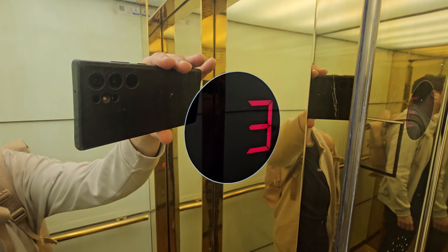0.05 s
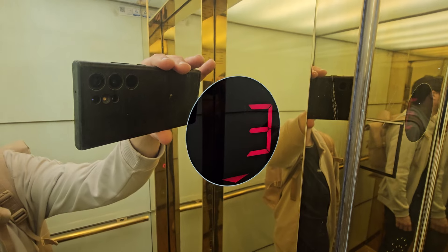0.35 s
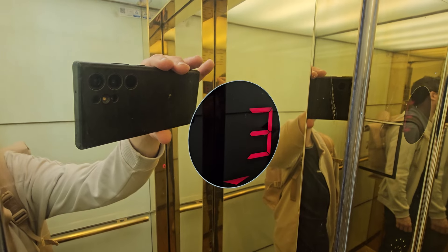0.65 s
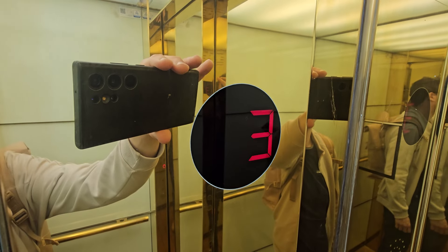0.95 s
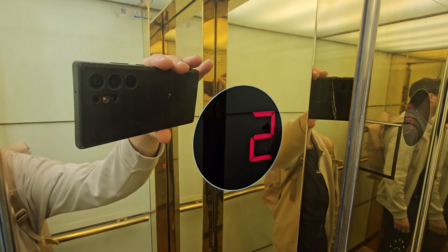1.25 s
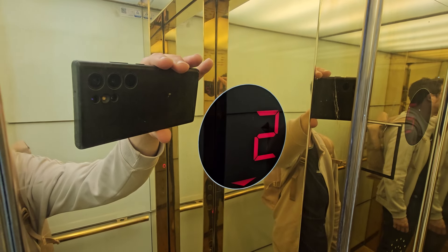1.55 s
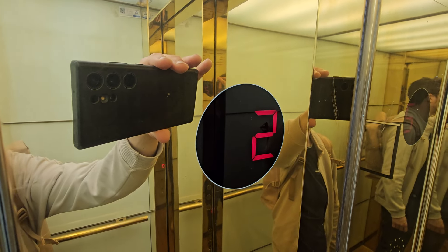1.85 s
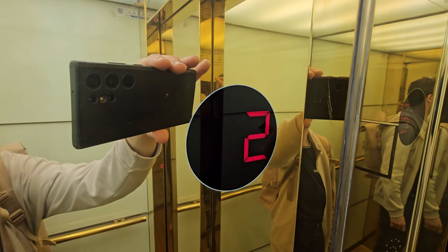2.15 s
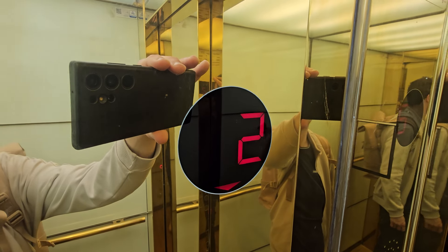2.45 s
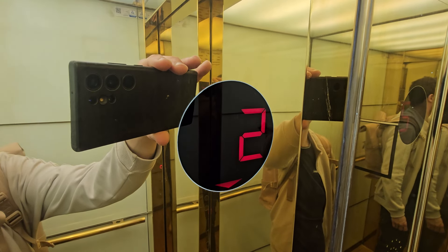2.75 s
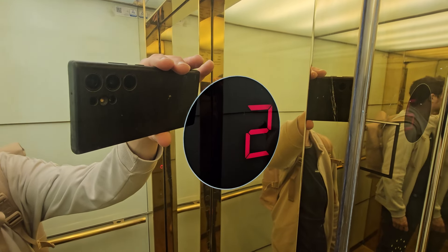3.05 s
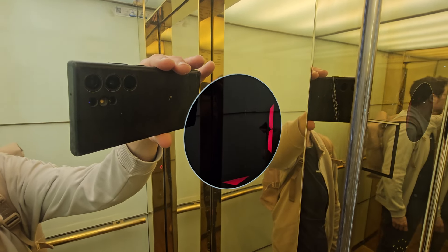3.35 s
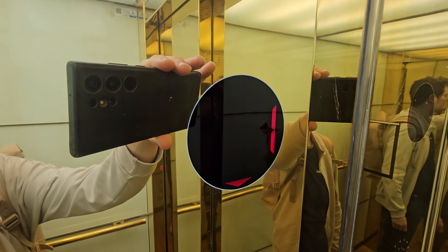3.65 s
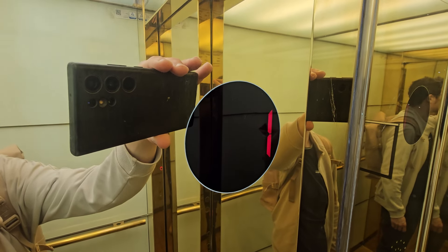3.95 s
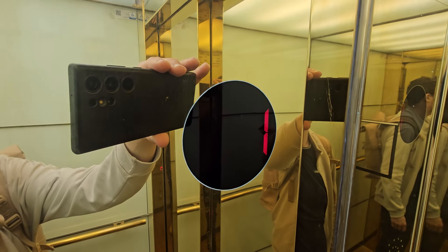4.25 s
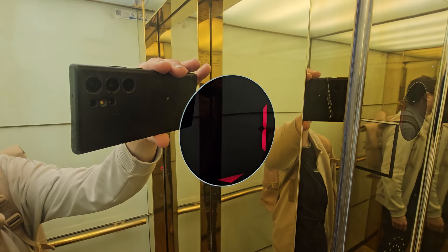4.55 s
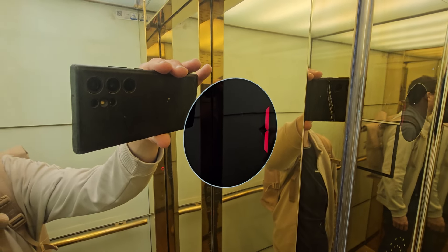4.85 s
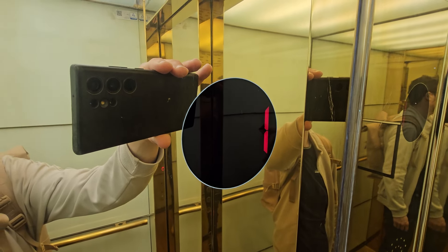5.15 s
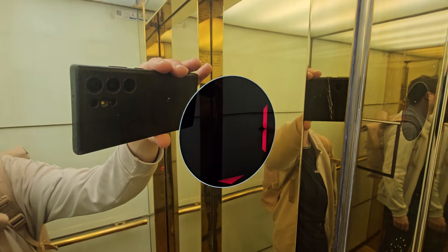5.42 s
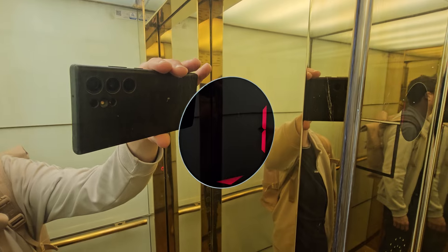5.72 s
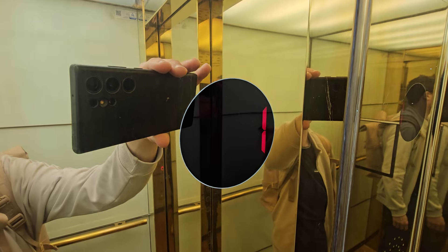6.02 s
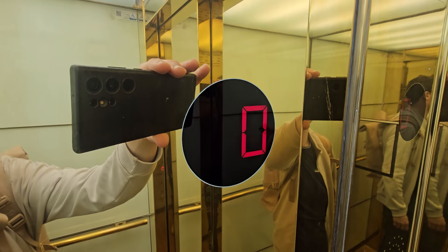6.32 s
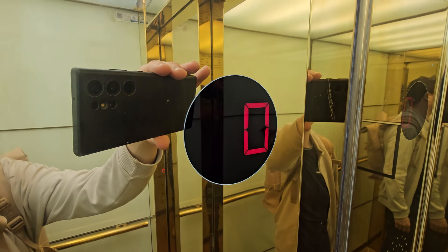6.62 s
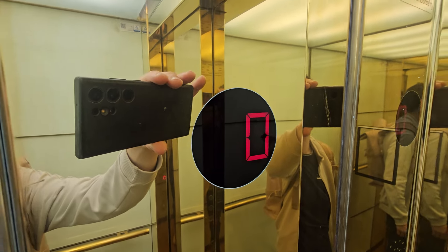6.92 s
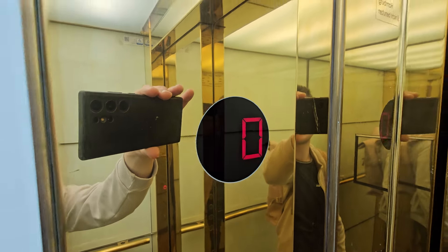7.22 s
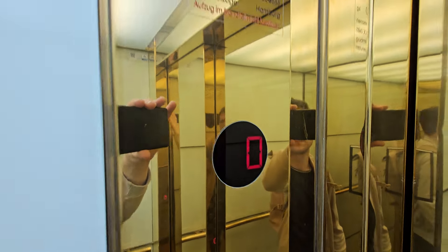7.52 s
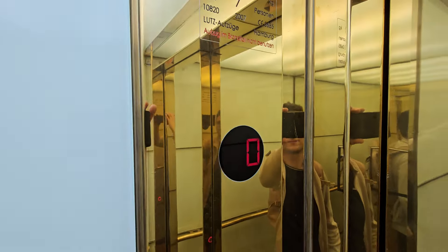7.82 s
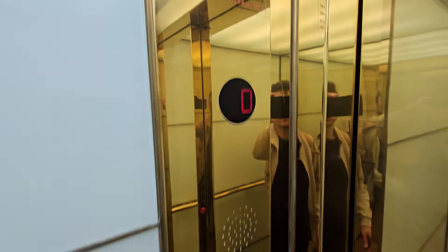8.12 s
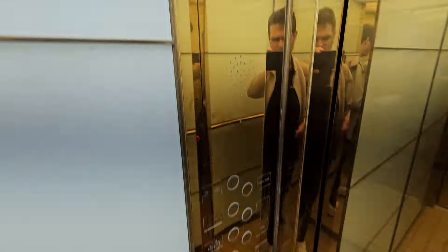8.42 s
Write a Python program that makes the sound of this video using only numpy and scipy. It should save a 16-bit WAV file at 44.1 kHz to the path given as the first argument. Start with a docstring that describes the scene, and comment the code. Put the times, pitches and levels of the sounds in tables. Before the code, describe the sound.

A passenger elevator travels down with a low, wavering rumble, heard from inside the cab. A fan and a faint electrical hum run underneath, along with a pulsing chirr from the drive. Short swishes pass, with a metal clack and then a lighter click. Air hiss grows toward the landing. The car slows with soft bumps and thin scrapes, and the door motor hums faintly as the ride eases.

```python
"""Inside the cab of a passenger lift that runs down its shaft and slows for the landing.
The ride shakes the cab, which booms at its lowest air mode and rings at higher ones; the drive chirrs
near 2 kHz. Air hiss and the gear's singing grow towards the landing over a bed of fan, mains hum and
thin electronic whine. Swishes, two metal knocks, rubs of the guides and soft bumps pass by, and the
door motor hums as the car stops."""
import sys
import numpy as np
from scipy import signal
from scipy.fft import rfft, irfft, next_fast_len
from scipy.io import wavfile
from scipy.ndimage import uniform_filter1d

SR = 44100
rng = np.random.default_rng(int(sys.argv[2]) if len(sys.argv) > 2 else 0)


def wav_out(sig):
    """Save sig, one row per channel (or a flat mono array), as 16-bit PCM at SR to the path in sys.argv[1]."""
    wavfile.write(sys.argv[1], SR, np.round(np.clip(np.atleast_2d(sig).T, -1, 1) * 32767).astype(np.int16))


N = 378378
TIME = np.arange(N) / SR
FREQ = np.maximum(np.fft.rfftfreq(next_fast_len(N, True), 1 / SR), 1)

# The cab's stereo image. Each row: frequency in Hz, balance in dB.
LEFT_OVER_RIGHT = [(110, 8.5), (200, -3.5), (380, -1), (700, -1), (1300, -4), (2400, -1.5), (4400, -4),
                   (8000, -2), (13000, -4.5)]
SIDE_OVER_MID = [(40, -13.5), (90, -22.5), (170, -26.5), (290, -8.5), (600, -2), (1300, 0.5), (3000, 0),
                 (8000, -0.5), (15000, 2.5)]

# Fader moves for the running layers. Each row: time in seconds, relative level in dB.
FAN_FADER = [(0, -41.5), (2.0, -36.5), (2.5, -35.5), (3.8, -43), (6.2, -41.5), (7.3, -46.5), (7.75, -36.5),
             (8.05, -34.5), (8.58, -37.5)]
OCTAVE_FADER = [(0, -48.5), (0.45, -43), (0.8, -45), (1.05, -55), (2.5, -50.5), (4.2, -46), (4.65, -50.5),
                (5.2, -46), (5.8, -54), (6.45, -47), (7.2, -60), (8.58, -72)]
DOOR_FADER = [(6.7, -92), (7.15, -67.5), (7.5, -67), (7.8, -63), (8.15, -72), (8.58, -66)]
AIR_FADER = [(0, -79.5), (2.0, -76.5), (3.3, -75), (5.2, -72), (5.85, -68), (6.6, -67.5), (7.7, -67),
             (8.58, -67)]
GEAR_FADER = [(0, -67.5), (2.2, -66), (4.2, -64.5), (5.0, -65), (6.1, -61.5), (6.7, -62), (7.3, -68),
              (8.58, -75)]
SWAY_FADER = [(0, -34.5), (1.4, -35.5), (3.7, -34.5), (4.5, -37), (6.0, -35.5), (6.95, -35), (7.6, -34.5),
              (8.58, -36)]
CAB_FADER = [(0, -41.5), (2.2, -40), (4.0, -40), (5.0, -40), (6.6, -38.5), (7.1, -41.5), (7.7, -46),
             (8.1, -47), (8.58, -51)]
BOOM_FADER = [(0.0, -27.5), (0.1, -20), (0.26, -30), (0.75, -27), (1.05, -32.5), (1.17, -21.5),
              (1.53, -26.5), (1.96, -22.5), (2.3, -27), (2.67, -32.5), (2.87, -20), (3.17, -22),
              (3.4, -27.5), (3.55, -27.5), (3.7, -27), (3.86, -13.5), (3.99, -20.5), (4.38, -31.5),
              (4.55, -25.5), (4.65, -19), (4.86, -34.5), (4.95, -20), (5.02, -31), (5.11, -20),
              (5.36, -27.5), (5.62, -19), (5.72, -21.5), (5.88, -17), (6.1, -34.5), (6.22, -22.5),
              (6.43, -30.5), (6.62, -20), (6.76, -33), (7.04, -36), (7.22, -26.5), (7.34, -36.5),
              (7.66, -38), (7.75, -22.5), (7.92, -43), (8.02, -26), (8.22, -45), (8.58, -41.5)]

# Broad tone of each noise layer. Each row: frequency in Hz, relative level in dB.
SHAFT_EQ = [(400, -13), (800, -14), (1200, -3.5), (1700, -8), (2150, 1.5), (2600, -12), (3150, -2.5),
            (3600, -1), (4100, -3), (4450, -5.5), (5200, -9), (7500, -11), (9000, -17.5), (10500, -33),
            (13000, -22.5), (15000, -36.5)]
LANDING_EQ = [(400, -1), (650, -5.5), (850, 1.5), (1200, -1.5), (1550, -4.5), (2100, -1), (2700, -8),
              (4200, -8), (4800, -14), (8500, -20.5), (10200, -31), (14000, -26.5), (15500, -37.5)]
SWISH_BODY_EQ = [(600, -3), (1150, -4.5), (1600, -8), (2200, -10.5)]
SWISH_RASP_EQ = [(1700, -2), (2500, -1), (3400, -2.5), (4700, -3.5), (6500, -17.5)]
SWISH_SIZZLE_EQ = [(5000, -14.5), (7800, -4.5), (10200, -9.5), (11800, -1), (14000, -4.5), (15500, -5.5)]
SWAY_EQ = [(10, -36.5), (18, -12), (28, -3), (38, -1), (52, -10), (68, -1.5), (80, -18.5), (120, -45)]
CAB_EQ = [(95, -22), (115, -11), (150, -0.5), (195, -17), (250, -16.5), (380, -14.5), (480, -15),
          (600, -23), (750, -30), (1200, -32), (1700, -35), (3000, -43.5)]

# Resonances of the landing, the gear, the drive and the cab's air and panels.
# Each row: frequency in Hz, width in Hz, relative level in dB.
LANDING_PEAKS = [(329, 28, 16), (414, 47, 14.5), (501, 12, 13), (566, 11, 12.5), (596, 18, 11.5),
                 (673, 24, 4.5), (1157, 6.7, 5.5), (1360, 46, 0), (1690, 30, 0), (1920, 100, 1.5),
                 (2200, 78, -4), (3680, 170, -11.5), (4200, 150, -8), (5650, 610, -10), (7300, 340, -13.5),
                 (8500, 190, -15.5)]
GEAR_PEAKS = [(1357, 17, -0.5), (1432, 59, -1), (1491, 20, 2.5), (2406, 50, -6), (2830, 96, -10.5),
              (3166, 105, -4.5), (3500, 81, -10), (4027, 125, -4.5), (4695, 130, -12.5), (6150, 130, -16),
              (7150, 210, -20)]
DRIVE_PEAKS = [(1870, 49, -6), (1975, 25, 0.5), (2056, 34, 0)]
CAB_PEAKS = [(98, 12.5, 7.5), (128.9, 15, 3.5), (159.7, 13.2, 6.5), (178.8, 5.5, 1), (206.2, 15.8, 1.5),
             (230.9, 6, 2), (276, 12, -7), (314.5, 35, -9.5), (347.2, 5.3, -2), (420, 21, -14),
             (445.8, 15.8, -3.5), (481, 4.9, -12.5), (511.3, 9.5, -11.5), (569, 10, -13.5), (587, 42, -19),
             (687, 22, -20.5), (801, 23, -23.5), (1020, 13, -28.5), (1110, 2, -31)]

# Hum of the mains and of the door motor. Each row: frequency in Hz, relative level in dB.
MAINS_PARTIALS = [(100, -45.5), (200, -68), (400, -70), (500, -65), (600, -73), (800, -80.5)]
DOOR_PARTIALS = [(598, 2), (685, -8), (1168, -12.5)]
# The whine as the listener shifts through its standing waves.
# Each row: time in seconds, left level in dB, right level in dB.
WHINE_FADERS = [(0, -57, -55), (0.45, -80.5, -60), (1.05, -85, -63.5), (1.25, -63, -55), (1.9, -64.5, -58),
                (2.1, -82, -57), (2.3, -61.5, -54.5), (2.8, -77, -61), (2.95, -69, -57.5),
                (3.55, -63, -62.5), (3.8, -77, -56.5), (4.4, -85, -68), (4.85, -75, -54), (5.6, -80, -61),
                (6.35, -80.5, -60.5), (6.6, -66, -62), (6.9, -77, -68), (7.3, -69, -63), (8.3, -61, -55),
                (8.58, -66, -62)]
# Thin sliding scrapes. Each row: peak time in seconds, length in seconds, pitch at the peak in Hz,
# glide in Hz per second, width in Hz, level in dB.
SCRAPES = [(6.95, 0.91, 3670, 10, 40, -69), (7.6, 1.3, 4245, 100, 60.4, -71.5),
           (7.85, .7, 2170, 60, 45, -67.5)]
# Squeaks and rubs of the guides.
# Each row: peak time in seconds, length in seconds, pitch in Hz, width in Hz, level in dB.
GUIDE_RUBS = [(0.973, 0.23, 1110, 480, -58), (1.245, 0.35, 783, 200, -61), (1.994, 0.053, 1150, 450, -57),
              (2.313, 0.096, 960, 25, -61), (4.478, 0.07, 940, 75, -56.5), (5.287, 0.036, 1490, 97.2, -62),
              (5.561, 0.35, 440, 32, -48.5), (6.219, 0.1, 465, 33.33, -44.5),
              (6.829, 0.063, 1140, 170, -57), (6.835, 0.057, 346, 55.6, -43), (7.182, 0.04, 574, 80, -52),
              (7.72, .07, 2400, 600, -61), (7.747, 0.09, 1190, 283.3, -55), (7.923, 0.041, 670, 86.4, -56)]
# Single resonances of the car.
# Each row: peak time in seconds, length in seconds, pitch in Hz, level in dB.
CAR_SWELLS = [(5.044, 0.18, 212, -43), (5.09, 0.094, 446.4, -43), (6.43, 0.09, 177.5, -42),
              (7.003, 0.28, 37.43, -30.5), (7.925, 0.056, 129.3, -40), (7.98, 0.19, 33, -32),
              (8.344, 0.45, 32.3, -38.5)]
# Soft jolts of the car. Each row: start in seconds, level in dB, centre pitch in Hz.
CAR_BUMPS = [(1.15, -38, 215), (6.617, -42, 145), (6.9, -40.5, 199), (7.472, -34, 128), (7.909, -37.5, 205),
             (8.225, -45, 167)]
# The ring of two passing metal parts, a sharp clack and a lighter click.
# Each row: frequency in Hz, relative level in dB, seconds to fall 60 dB.
CLACK_RING = [(1070, -3.5, .26), (1107, 1, 0.27), (1700, -9.5, 0.26), (2135, -2, 0.25), (2900, -7.5, .14),
              (3280, -6, 0.081), (3960, -10.5, .26), (4820, -18, .14)]
CLICK_RING = [(1245, -6, .25), (1440, -6.5, 0.2), (1760, -13, .22), (3400, -1, .2), (4470, 1, .2),
              (5900, -6, .16), (8060, -6, .17)]
# Sliding contacts. Each row: start, rise, hold and body lag in seconds; body, rasp and sizzle levels
# in dB; sizzle tilt in dB per octave; left over right in dB.
SWISH_CUES = [(0.0, 0.0023, 0.043, 0.044, -52.5, -52, -44, -1, -3),
              (1.22, 0.012, 0.042, 0.013, -61, -62, -80, 9, -4),
              (2.413, 0.007, 0.012, .012, -51, -50.5, -59, -11.5, -3),
              (2.892, 0.016, 0.042, .012, -66, -63.5, -86, 5, -3),
              (3.649, 0.017, 0.02, 0.015, -53.5, -57, -52, -10, -4),
              (6.201, 0.012, 0.014, 0.01, -77, -64, -65, 1, -11),
              (7.991, 0.053, 0.03, .012, -86, -86, -62, -9, -5)]
# The drive's chirr. Each row: time in seconds, relative level in dB, pulse depth from 0 to 1.
DRIVE_PULSE = [(0, -66, 0.6), (0.7, -63, 0.6), (1.15, -67, .3), (1.75, -65.5, .42), (2.6, -66.5, 0.14),
               (3.55, -66, 0.3), (4.2, -65, 0.3), (4.8, -62.5, 0.6), (5.3, -64.5, 0.47), (5.6, -68.5, 0.4),
               (5.85, -63.5, 0.45), (6.4, -64, 0.14), (7.0, -71.5, 0.2), (8.58, -86, .2)]
# The drive's speed. Each row: time in seconds, turns per second.
DRIVE_SPEED = [(0, 22.3), (0.9, 22.8), (1.4, 18), (1.7, 22), (4.7, 19.8), (5.1, 20.8), (5.45, 23.5),
               (5.85, 21.6), (8.58, 18)]


def from_db(db):
    """Decibels to gain."""
    return 10 ** (np.asarray(db) / 20)


def rms_one(x):
    """Scale to unit power."""
    return x / np.sqrt(np.mean(x ** 2) + 1e-20)


def in_time(rows):
    """Each column of a timed curve at every sample."""
    s, *columns = np.transpose(rows)
    return [np.interp(TIME, s, c) for c in columns]


def at_hz(points, hz):
    """Read a table on a log-frequency axis."""
    f, value = np.transpose(points)
    return np.interp(np.log(hz), np.log(f), value)


def ramp(start_s, length_s):
    """An even rise from 0 to 1."""
    return np.clip((TIME - start_s) / length_s, 0, 1)


def bell(t, length):
    """A smooth swell and fade that peaks at t = 0."""
    return np.exp(-2 * (t / length) ** 2)


def hit(t, rise, hold, t60):
    """A straight attack, a hold, then a tail that falls 60 dB in t60 seconds."""
    return np.minimum(t / rise, 1) * np.exp(-np.log(1000) * np.maximum(t - rise - hold, 0) / t60)


def pan(db):
    """Channel gains that put the left db above the right."""
    return from_db(np.array([[db], [-db]]) / 2)


def band(centre, width):
    """The gain curve of one resonance."""
    return lambda hz: 1 / (1 + (2 * (hz - centre) / width) ** 2)


def colour(points, modes=(), at=FREQ):
    """Gain per frequency: a broad slope, rolled off at both ends, with resonances standing on it."""
    ends = np.minimum(1, at / points[0][0]) * np.minimum(1, points[-1][0] / at)
    power = (from_db(at_hz(points, at)) * ends ** 2) ** 2
    for hz, width, db in modes:
        power = power + from_db(db) ** 2 / (1 + ((at - hz) / width) ** 2 * 2) ** 2
    return np.sqrt(power)


def noise(gain):
    """Coloured stereo noise of unit power, narrow in the bass and wide in the treble."""
    mid, side = rng.standard_normal((2, len(FREQ))) + 1j * rng.standard_normal((2, len(FREQ)))
    sides = np.array([[1], [-1]])
    pair = mid + from_db(at_hz(SIDE_OVER_MID, FREQ)) * side * sides
    # long waves reach both sides equally
    lean_db = at_hz(LEFT_OVER_RIGHT, FREQ) * (FREQ > LEFT_OVER_RIGHT[0][0])
    return rms_one(irfft(pair * gain * from_db(sides * lean_db / 2))[:, :N])


def drift(rate, step=40):
    """A random wobble of unit power, mostly slower than rate in Hz."""
    hz = np.fft.rfftfreq(next_fast_len(N // step + 2, True), step / SR)
    white = rng.standard_normal(len(hz)) + 1j * rng.standard_normal(len(hz))
    slow = irfft(white / (1 + (hz / rate) ** 2) ** 2)
    return rms_one(np.interp(np.arange(N) / step, np.arange(len(slow)), slow))


def burst(envelope, gain_at):
    """A short stretch of diffuse stereo noise under an envelope."""
    hz = np.maximum(np.fft.rfftfreq(len(envelope), 1 / SR), 1)
    white = rng.standard_normal((2, len(envelope)))
    return envelope * rms_one(irfft(rfft(white) * gain_at(hz)))


def narrow(hz, width_hz):
    """A narrow resonance rubbed at random; each side hears its own echoes."""
    phase = 2 * np.pi * np.cumsum(hz * np.ones(N)) / SR
    pair = [drift(width_hz) * np.cos(phase) + drift(width_hz) * np.sin(phase) for _ in range(2)]
    return rms_one(np.array(pair))


def tones(partials, waver_db):
    """Steady pitches whose strength wavers in the cab's standing waves."""
    out = 0
    for hz, db in partials:
        level = from_db(db + waver_db * drift(rate=0.61))
        out = out + level * np.sqrt(2) * np.sin(2 * np.pi * (hz * TIME + rng.random()))
    return out


def add(out, s, sound):
    """Mix a sound in from a given time."""
    start = max(0, round(s * SR))
    out[:, start:start + sound.shape[1]] += sound[:, :N - start]


def standing_waves(spacing_hz=22, depth_db=3.0, onset_hz=700):
    """Crowded modes between hard walls: narrow peaks and dips, different left and right."""
    knots = np.arange(0, SR / 2, spacing_hz)
    heights = rng.standard_normal((SR // 8, 2))[:len(knots)].T
    ripple = np.array([np.interp(FREQ, knots, side) for side in heights])
    return from_db(depth_db * ripple * np.minimum(1, FREQ / onset_hz) ** 4)


def electrics(whine_hz=15686, fuzz_db=-13, waver_db=4.0):
    """Mains hum, and a thin whine that flutters once the listener turns through its standing waves."""
    phase = 2 * np.pi * whine_hz * TIME + np.array([[np.pi / 2], [0]])   # the sides are out of step
    turned = ramp(start_s=6.7, length_s=.5)   # towards the door
    steady = np.sqrt(2 * (1 - turned)) * np.sin(phase)
    flutter = np.sqrt(turned) * narrow(whine_hz, width_hz=30)
    fuzz = from_db(fuzz_db) * narrow(whine_hz, width_hz=90)
    hum = tones(MAINS_PARTIALS, waver_db)
    whine_level = from_db(in_time(WHINE_FADERS) + waver_db * drift(rate=12))
    return hum + whine_level * (steady + flutter + fuzz)


def drone(hz, fader, waver_db, wander_hz=.9):
    """A smooth, slightly wandering low note, for the fan or the octave above the boom."""
    phase = 2 * np.pi * np.cumsum(hz + wander_hz * drift(rate=2.88)) / SR
    level = from_db(in_time(fader)[0] + waver_db * drift(rate=1.8))
    return level * np.sqrt(2) * np.sin(phase)


def door_motor():
    """The motor hums as the door slides open at the landing."""
    return from_db(in_time(DOOR_FADER)[0]) * tones(DOOR_PARTIALS, waver_db=3.5)


def air_hiss(walls, shaft_db=9.5, landing_db=15.0, bleed=0.026, flutter_db=1.12):
    """Air streams past and crossfades to a new colour as the car draws level with the landing."""
    near = np.clip(ramp(start_s=6.16, length_s=0.93), bleed, 1 - bleed)
    shaft = from_db(shaft_db) * np.sqrt(1 - near) * noise(walls * colour(SHAFT_EQ))
    landing_colour = standing_waves() * colour(LANDING_EQ, LANDING_PEAKS)
    landing = from_db(landing_db) * np.sqrt(near) * noise(landing_colour)
    return from_db(in_time(AIR_FADER)[0] + flutter_db * drift(rate=23)) * (shaft + landing)


def gear_singing(flutter_db=1.46):
    """The running gear sings in narrow resonances, louder towards the landing, fading as it stops."""
    level = from_db(in_time(GEAR_FADER)[0] + flutter_db * drift(rate=40))
    return level * noise(colour([(1000, -40.5), (7000, -56)], GEAR_PEAKS))


def scrapes():
    """Thin scraping notes swell, glide a little and fade as the car stops and the door opens."""
    return sum(from_db(db) * bell(TIME - s, length) * narrow(hz + glide * (TIME - s), width)
               for s, length, hz, glide, width, db in SCRAPES)


def guide_rubs():
    """A guide catches for a moment and one resonance swells."""
    out, t = np.zeros((2, N)), TIME[:SR]
    middle = t.mean()
    for s, length, hz, width, db in GUIDE_RUBS:
        add(out, s - middle, from_db(db) * burst(bell(t - middle, length), band(hz, width)))
    return out


def car_swells():
    """The car shudders or hoots at one of its resonances for a moment."""
    return sum(bell(TIME - s, length) * tones([(hz, db)], waver_db=2.5)
               for s, length, hz, db in CAR_SWELLS)


def car_bumps(spread_octaves=0.18):
    """A soft jolt sets the low cab modes around one pitch ringing."""
    out, t = np.zeros((2, N)), TIME[:SR]
    envelope = hit(t, rise=0.017, hold=0, t60=0.3)
    hz, _, mode_db = np.transpose(CAB_PEAKS)
    for s, db, centre_hz in CAR_BUMPS:
        push = from_db(mode_db) * np.exp(-(np.log2(hz / centre_hz) / spread_octaves) ** 2)
        ring = push @ np.sin(2 * np.pi * (np.outer(hz, t) + rng.random((len(hz), 1))))
        add(out, s, from_db(db) * envelope * rms_one(ring)[None])
    return out


def knock(modes, start_s, gain_db, rise_s, contact_s, width_hz, pan_db):
    """A chattering contact rattles a metal part; each cluster of modes dies at its own rate."""
    out, t = np.zeros((2, N)), TIME[:SR // 2]
    for hz, db, t60 in modes:
        ring = burst(hit(t, rise_s, contact_s, t60), band(hz, width_hz))
        add(out, start_s, from_db(gain_db + db) * ring)
    return out * pan(pan_db)


def swishes(body_t60=0.62, rasp_t60=0.17, sizzle_t60=.18, rasp_lag_share=.4, pivot_hz=10000):
    """Sliding contacts die away between hard walls: the sizzle leads, the body comes late and lasts."""
    out, t = np.zeros((2, N)), TIME[:SR // 2]
    for s, rise, hold, body_lag, body_db, rasp_db, sizzle_db, tilt_db, pan_db in SWISH_CUES:
        body = (body_lag, body_db, body_t60, lambda hz: colour(SWISH_BODY_EQ, at=hz))
        rasp = (body_lag * rasp_lag_share, rasp_db, rasp_t60, lambda hz: colour(SWISH_RASP_EQ, at=hz))
        sizzle = (0, sizzle_db, sizzle_t60,
                  lambda hz: colour(SWISH_SIZZLE_EQ, at=hz) * from_db(tilt_db * np.log2(hz / pivot_hz)))
        for lag, db, t60, gain_at in (body, rasp, sizzle):
            add(out, s + lag, from_db(db) * pan(pan_db) * burst(hit(t, rise, hold, t60), gain_at))
    return out


def drive(wander_hz=0.76, chirp_hz=2078, bend_hz=24, jitter_hz=22, uneven_db=2.0):
    """The drive chirps once a turn, over a chirr in a few narrow resonances."""
    db, depth = in_time(DRIVE_PULSE)
    turn = 2 * np.pi * np.cumsum(in_time(DRIVE_SPEED)[0] + wander_hz * drift(rate=15)) / SR
    pitch = chirp_hz + bend_hz * np.cos(turn) + jitter_hz * drift(rate=50)
    echo_phase = .7 * np.array([drift(rate=30), drift(rate=38)])   # each side hears its own echoes
    phase = 2 * np.pi * np.cumsum(pitch) / SR + echo_phase
    chirp = from_db(-4.5) * rms_one(from_db(uneven_db * drift(rate=16)) * np.sin(phase))
    chirr = from_db(-1.5) * noise(colour([(1000, -44.0), (7000, -56.5)], DRIVE_PEAKS))
    return from_db(db) * (1 + depth * np.cos(turn)) * (chirp + chirr)


def ride_rumble(walls):
    """The car sways on its ropes; rolling shakes the cab's modes, which fade as it brakes."""
    sway = from_db(in_time(SWAY_FADER)[0]) * noise(colour(SWAY_EQ))
    cab = from_db(in_time(CAB_FADER)[0]) * noise(walls * colour(CAB_EQ, CAB_PEAKS))
    return sway + cab


def cab_boom(hz=88.2, trim_db=-2.5, wander_hz=0.84, beating=0.32, steady_s=0.32, left_lag_s=.00027):
    """The cab's lowest air mode, shaken unevenly: one wavering, beating tone, a touch late on the left."""
    cycles = np.cumsum(hz + wander_hz * drift(rate=4)) / SR
    phase = 2 * np.pi * (cycles - hz * np.array([[left_lag_s], [0]]))
    beats = 1 + beating * (drift(rate=6) + 1j * drift(rate=6))
    beats /= np.sqrt(uniform_filter1d(np.abs(beats) ** 2, int(steady_s * SR)))   # even out slow swings
    level = from_db(in_time(BOOM_FADER)[0] + trim_db)
    return level * np.sqrt(2) * np.abs(beats) * np.sin(phase + np.angle(beats))


def scene():
    """The full mix inside the cab."""
    clack = knock(CLACK_RING, start_s=2.418, gain_db=-52, rise_s=0.015, contact_s=0.031,
                  width_hz=100, pan_db=-5.0)
    click = knock(CLICK_RING, start_s=3.657, gain_db=-58, rise_s=0.016, contact_s=0.022,
                  width_hz=170, pan_db=-4.5)
    boom = cab_boom()
    fan = drone(hz=97.05, fader=FAN_FADER, waver_db=3.85)
    octave = drone(hz=175.7, fader=OCTAVE_FADER, waver_db=3.0)
    machinery = fan + drive() + gear_singing() + door_motor() + electrics()
    walls = standing_waves()
    ride = boom + octave + ride_rumble(walls) + air_hiss(walls)
    spot_effects = car_swells() + scrapes() + swishes() + clack + click + guide_rubs() + car_bumps()
    return machinery + ride + spot_effects


def record(dry, fade_s=0.0028, cutoff_hz=15950):
    """A steep high cut, with tiny fades so the sound opens and closes without a click."""
    fades = np.clip(np.minimum(TIME, TIME[-1] - TIME) / fade_s, 0, 1)
    high_cut = signal.ellip(12, .1, 90, cutoff_hz, fs=SR, output="sos")
    return signal.sosfilt(high_cut, dry * fades)


dry = scene()
out = record(dry)
wav_out(out)
```